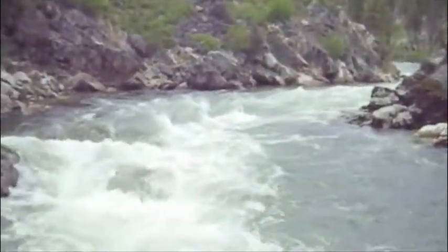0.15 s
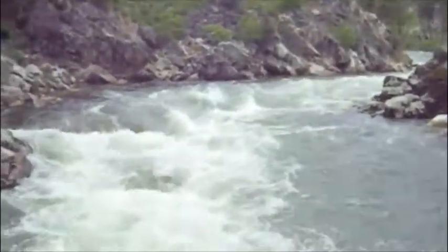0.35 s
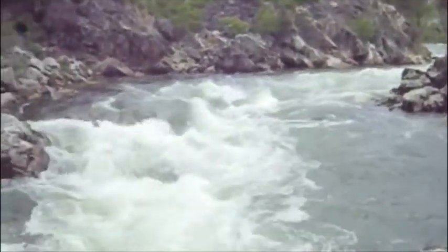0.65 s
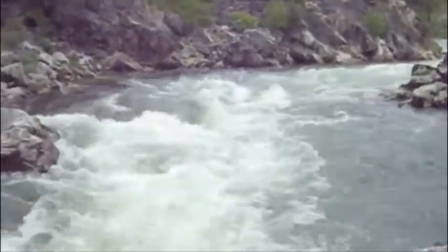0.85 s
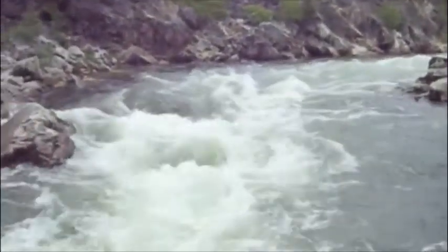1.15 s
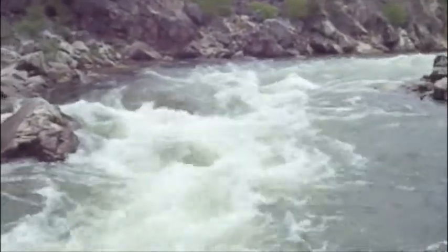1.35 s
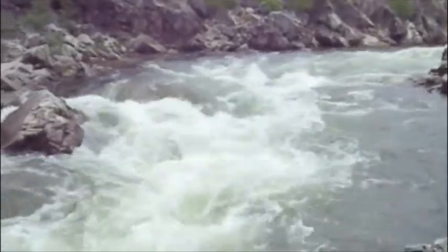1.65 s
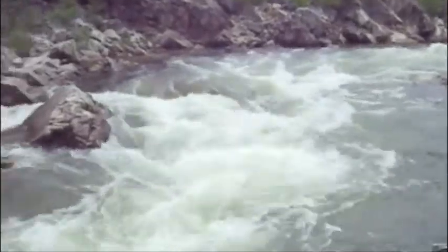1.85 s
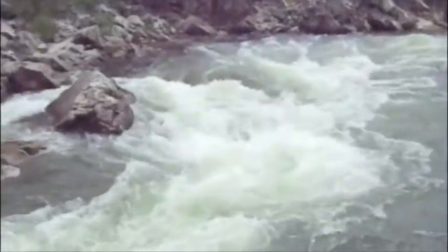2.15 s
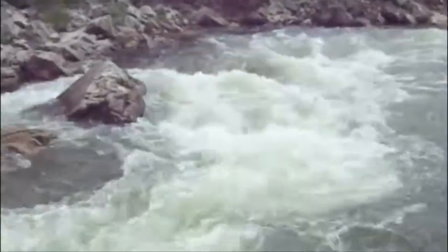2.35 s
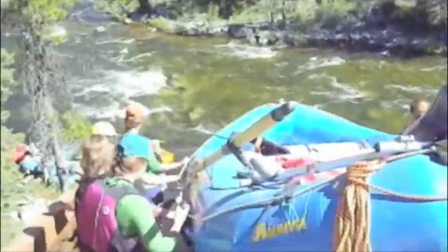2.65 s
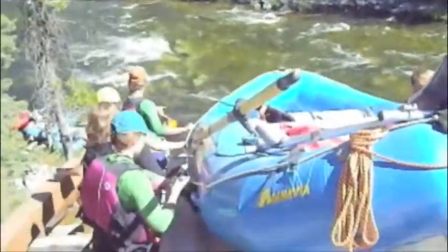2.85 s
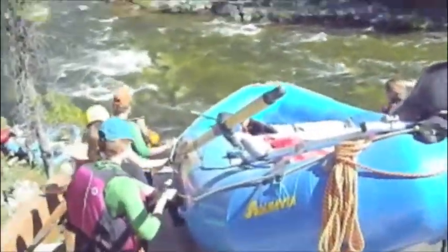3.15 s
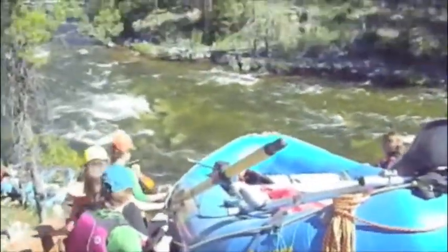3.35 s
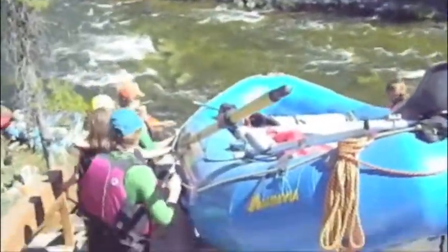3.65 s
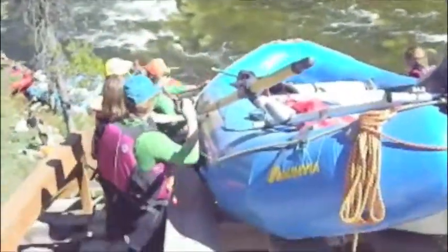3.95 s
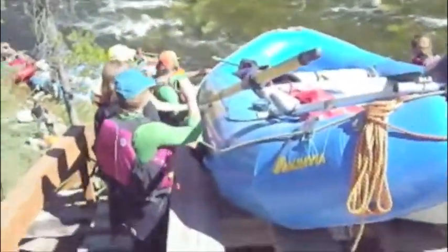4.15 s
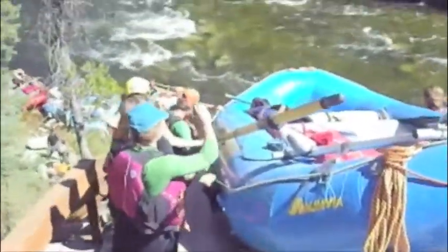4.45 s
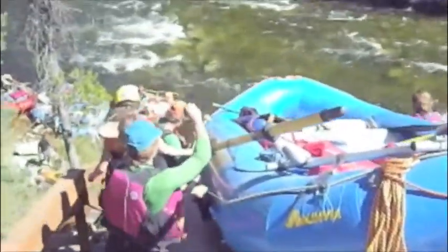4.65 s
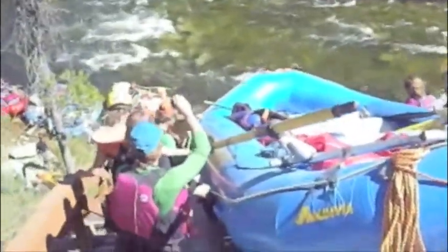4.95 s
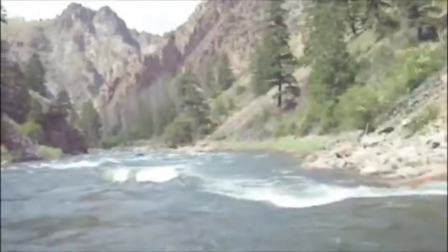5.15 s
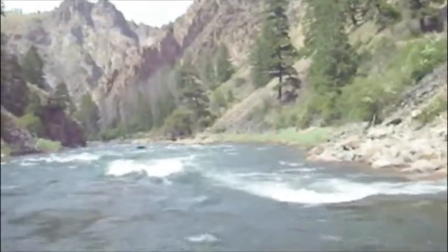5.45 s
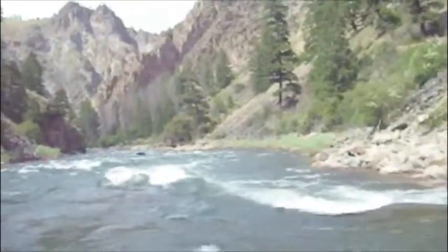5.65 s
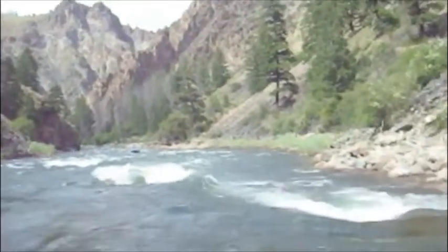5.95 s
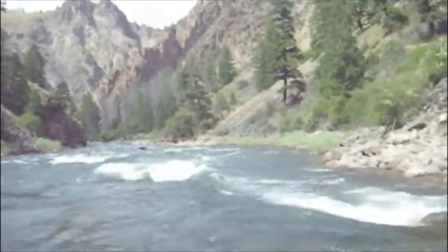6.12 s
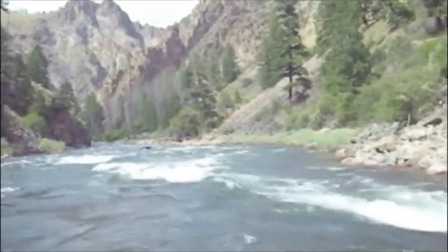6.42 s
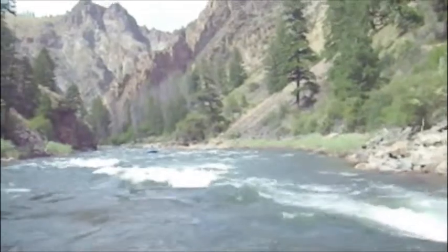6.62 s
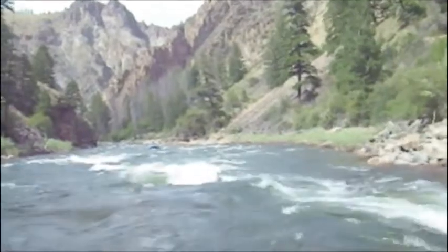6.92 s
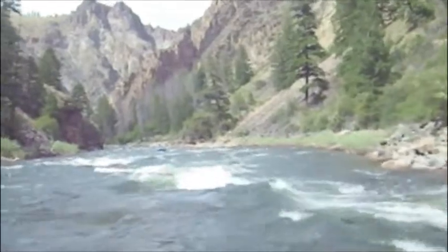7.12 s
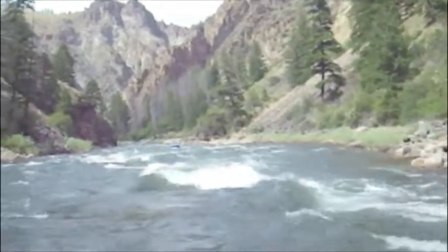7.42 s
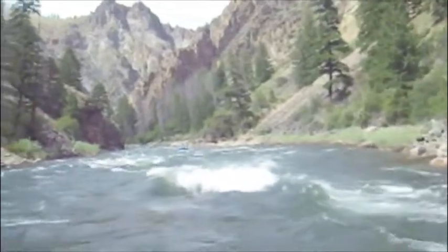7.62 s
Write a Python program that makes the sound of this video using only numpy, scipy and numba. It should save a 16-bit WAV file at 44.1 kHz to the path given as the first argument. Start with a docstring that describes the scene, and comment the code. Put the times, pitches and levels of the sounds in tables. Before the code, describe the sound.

A big river rapid roars close by, full of churning bubbles and hissing spray. It fades quickly to a much quieter shallow current beside a boat ramp, where wind brushes the microphone, raft gear knocks a few times and something squeaks faintly. Then the rush comes back louder as breaking waves draw nearer, with a few small splashes close by. One small mono microphone hears it all outdoors in a canyon.

```python
"""Three stretches of a canyon river, heard by one small mono microphone, each fading out before the next.
First a big rapid roars close by: clouds of ringing bubbles and bursting spray ride on churning water.
Then a shallow riffle runs past a boat ramp, where wind brushes the microphone, raft gear knocks and
something squeaks faintly. Last, a train of breaking waves draws nearer, with single splashes close by."""
import sys
import numpy as np
from scipy import signal
from scipy.fft import rfft, irfft, next_fast_len
from scipy.io import wavfile
from scipy.ndimage import uniform_filter1d, minimum_filter1d
from numba import njit

SR = 44100
rng = np.random.default_rng(int(sys.argv[2]) if len(sys.argv) > 2 else 0)


def materialize(psi):
    """Save the field psi as 16-bit PCM at rate SR to the path in sys.argv[1].

    A 1-D psi becomes a single channel; in a 2-D psi each row is a channel.
    """
    bounded = np.clip(np.atleast_2d(psi).T, -1, 1)
    quanta = np.round(bounded * 32767).astype(np.int16)
    wavfile.write(sys.argv[1], SR, quanta)


N = 343098
T = np.arange(N) / SR

# tone colour of the roar in each stretch: (frequency [Hz], relative level [dB])
RAPID_ROAR = [(10, -55), (25.0, -23.0), (62.6, -22.5), (184.0, -6.5), (447.0, -5.0), (614.0, 0.0),
              (950.0, -0.5), (1320.0, -4), (1620.0, -1.5), (2150.0, -6.0), (5300.0, -3.0), (6400.0, -7.5),
              (7650.0, -20.5), (10000, -58)]
RIFFLE_ROAR = [(30, -40), (130.0, -16.5), (328.0, -6.5), (424.0, -3.0), (819.0, 0.5), (995.0, -2.0),
               (1340.0, -4.0), (1750.0, -2.0), (2050.0, -7.5), (2300.0, -6.5), (3120.0, -10.0),
               (7000.0, -10.5), (7650.0, -15.5), (10000, -51)]
WAVES_ROAR = [(10, -50), (25.0, -21), (62.6, -25.5), (184.0, -7.5), (379.0, -5), (557.0, -0.5),
              (800.0, -2.5), (1600.0, -5.5), (2420.0, -7.5), (3100.0, -4), (3950.0, -10.0), (5100.0, -5.5),
              (6400.0, -13), (7650.0, -25.5), (10000, -57)]
# tone colour of the fine spray in each stretch: (frequency [Hz], relative level [dB])
RAPID_SPRAY = [(4760, -41), (8100, -0.5), (8630, 3), (11100, -0.5), (13400, -6.5), (14800, -25)]
RIFFLE_SPRAY = [(4760, -20), (8100, -6), (8410, 1), (9050, -7), (9890, 0), (11900, -11), (14800, -21)]
WAVES_SPRAY = [(4760, -28), (8100, -0.5), (8370, -2.5), (9890, -8.5), (11600, -7.5), (13600, -18),
               (14800, -28)]
# tone colour of the wind: (frequency [Hz], relative level [dB])
WIND_RUMBLE = [(8, -3), (22, 4), (45, -7), (90, -14.5), (200, -25), (900, -90)]
# gusts on the microphone: (peak time [s], level above the breeze [dB])
GUSTS = [(2.89, 4.5), (3.13, 4), (3.3, 4), (3.5, 5), (4.03, 6), (4.24, 4)]
# faint squeaks at the ramp: (time [s], length [s], start pitch [Hz], end pitch [Hz], peak level [dB])
SQUEAKS = [(3.03, 0.11, 1660, 1540, -31), (3.13, .07, 860, 880, -35), (3.249, 0.093, 1530, 1620, -31),
           (3.99, 0.103, 1410, 1510, -32), (4.0, .06, 1260, 1200, -30)]
# knocks of raft gear: (time [s], level [dB], lowest tone [Hz], time to fade by 60 dB [s])
KNOCKS = [(2.854, -9, 1760, 0.0089), (2.8555, -20, 790, 0.1), (2.878, -15, 1750, .01),
          (2.8786, -17.5, 850, 0.069), (3.145, -27, 860, .14), (4.2038, -13, 2620, 0.011),
          (4.372, -19, 860, 0.045), (4.4033, -17, 7200, .012), (4.404, -19, 9500, .022),
          (4.4133, -18, 9400, .022)]
# tones that struck gear rings with: (pitch [times the lowest tone], relative level [dB])
GEAR_TONES = [(1, 1.5), (1.2, -7), (1.55, -15), (2.5, -9)]
# close splashes, each trapping one bubble: (time [s], level [dB], pitch [Hz], ring length [cycles])
SPLASHES = [(5.17, -11, 3200, 14), (5.2384, -9, 11000, 16), (5.2384, -6, 2860, 29), (5.292, -17, 990, 22),
            (5.3028, -9.5, 3000, 32), (5.455, -13, 1440, 36), (7.116, -16, 4800, 16),
            (7.592, -14, 9000, 20)]
# moments when the water swells: (peak time [s], length [s], roar change [dB], spray change [dB])
SWELLS = [(0.1, 0.33, 1, 0.5), (0.325, .1, .8, 2), (1.76, 0.27, -0.3, 2.5), (2.197, .14, 1.5, 2.5),
          (2.907, 0.61, 3, 1.2)]
# sudden dips in the level, which then creeps back: (time [s], depth [dB])
DIPS = [(1.085, 1.5), (2.208, 4), (5.245, 3)]

RAMP_START_S, WAVES_START_S, FADE_S = 2.48, 5.047, 0.097
TOP_HZ = 14700  # the treble is cut off above this


def undb(db):
    """Turn decibels into a number to multiply a sound by."""
    return 10 ** (np.asarray(db) / 20)


def unit(x):
    """Scale a signal so that its average strength (rms) is 1."""
    return x / np.sqrt(np.mean(x ** 2))


def colour(x, points):
    """Give a sound the tone colour of a table, at strength 1."""
    size = next_fast_len(N)
    hz, db = np.transpose(points)
    bin_hz = np.maximum(np.arange(size // 2 + 1) * SR / size, 1)
    gain = undb(np.interp(np.log(bin_hz), np.log(hz), db))
    return unit(irfft(rfft(x, size) * gain, size)[:N])


def wander(rate):
    """A smooth random curve of strength 1 that heads for a new value `rate` times a second."""
    hold = int(SR / rate)
    steps = np.repeat(rng.standard_normal(N // hold + 1), hold)
    return unit(uniform_filter1d(uniform_filter1d(steps, hold), hold // 2)[:N])


def hump(peak_s, length_s):
    """A smooth rise from 0 to 1 and back."""
    return np.cos(np.pi * np.clip((T - peak_s) / length_s, -.5, .5)) ** 2


def fade(seconds_inside):
    """A straight fade from silence at the edge of a stretch."""
    return np.clip(seconds_inside / FADE_S, 0, 1)


def slap(decay_s, low_hz, high_hz, order=2):
    """The sound of a hit: a burst of noise between two frequencies that dies at once."""
    t = T[:SR // 10]
    decay = np.exp(-t / decay_s)
    band = signal.butter(order, [min(low_hz, SR / 4), min(high_hz, SR / 3)], "band", fs=SR, output="sos")
    burst = signal.sosfilt(band, rng.standard_normal(len(t)) * decay)
    return burst * np.linalg.norm(decay) / np.linalg.norm(burst)


def dull(x, edge_hz):
    """The small microphone hears little of a click's highest treble."""
    return signal.sosfilt(signal.butter(2, edge_hz, fs=SR, output="sos"), x)


def wind(breeze_db, flutter_db, gust_s):
    """Swirls of air buffet the microphone with a low flutter that grows in each gust."""
    gust_db = sum(db * hump(peak_s, gust_s) for peak_s, db in GUSTS)
    rumble = colour(rng.standard_normal(N), WIND_RUMBLE)
    return rumble * undb(breeze_db + gust_db + flutter_db * wander(rate=8))


def squeaks():
    """Thin sliding tones that swell and fade."""
    out = np.zeros(N)
    for start_s, length_s, from_hz, to_hz, db in SQUEAKS:
        first, n = int(start_s * SR), int(length_s * SR)
        phase = 2 * np.pi * np.cumsum(np.linspace(from_hz, to_hz, n)) / SR
        out[first:first + n] += undb(db) * np.hanning(n) * np.sin(phase)
    return out


def gear_knocks(crack_db, crack_s):
    """Struck gear gives a short crack and a few quickly dying tones; smaller parts crack higher."""
    out, t = np.zeros(N), T[:SR // 10]
    for start_s, db, hz, ring_s in KNOCKS:
        tones = sum(undb(tone_db) * np.sin(2 * np.pi * hz * ratio * t)
                    for ratio, tone_db in GEAR_TONES if hz * ratio < TOP_HZ)
        decay = np.exp(-np.log(1000) * t / ring_s)
        crack = undb(crack_db) * slap(crack_s, hz / 2, hz * 2, order=3)
        first = int(start_s * SR)
        out[first:first + len(t)] += undb(db) * (tones * decay + crack)
    return out


@njit
def ring_bubbles(start_s, hz, gain, cycles, glide):
    """Each bubble rings with a tone that dies away while its pitch rises by the fraction `glide`."""
    out = np.zeros(N)
    for k in range(len(start_s)):
        n = int(cycles[k] * SR / hz[k]) + 2
        angle = 2 * np.pi * hz[k] / SR
        # a point spiralling inwards traces the tone, fading by 50 dB in n samples
        step = np.exp(1j * angle - 5.8 / n)
        bend = np.exp(1j * angle * glide / n)
        point = gain[k] + 0j
        first = int(start_s[k] * SR)
        for i in range(first, min(first + n, N)):
            point *= step
            step *= bend
            out[i] += point.imag
    return out


def splashes(slap_db, slap_s, glide):
    """Water slaps the surface, then the trapped bubble rings."""
    start_s, db, hz, cycles = np.array(SPLASHES, float).T.copy()
    out = ring_bubbles(start_s, hz, undb(db), cycles, glide)
    for first, gain, pitch in zip((start_s * SR).astype(int), undb(db + slap_db), hz):
        burst = gain * slap(slap_s, pitch / 2, pitch * 2)
        out[first:first + len(burst)] += burst
    return out


def churn(flicker_db, flicker_rate, octaves=9):
    """Countless far bubbles blur into noise in which each octave flickers on its own."""
    size = next_fast_len(N)
    spectrum = rfft(rng.standard_normal(size))
    share_of_top = np.arange(1, len(spectrum) + 1) / len(spectrum)
    octave = np.clip(np.log2(share_of_top) + octaves, 0, octaves - 1).astype(int)
    bands = (irfft(spectrum * (octave == k), size)[:N] for k in range(octaves))
    return unit(sum(band * undb(flicker_db * wander(flicker_rate)) for band in bands))


def bubble_cloud(low_hz, high_hz, cycles, spread_db, glide, count):
    """Bubbles ring at random times, many quiet and a few loud, their power even from low to high."""
    when, pitch, chance, length = rng.random((count, 4)).T
    hz = low_hz + (high_hz - low_hz) * pitch ** 2
    extra_db = -spread_db * np.log(np.maximum(chance, 1 / 200))
    # high bubbles ring briefly and lie further apart in pitch, so each is made stronger
    gain = np.sqrt(hz * pitch) * undb(extra_db)
    return unit(ring_bubbles(when * N / SR, hz, gain, cycles * (.5 + length), glide))


def swelling():
    """How far the swells move the roar and the spray from their even flow, in dB."""
    return sum(np.outer([roar_db, spray_db], hump(peak_s, length_s))
               for peak_s, length_s, roar_db, spray_db in SWELLS)


def approach(near_s, roar_db_per_s, spray_db_per_s):
    """Roar and spray climb steadily to 0 dB as the waves come near, then stay there."""
    return np.outer([roar_db_per_s, spray_db_per_s], np.minimum(T - near_s, 0))


def dips(hold_s=0.064, recovery_db_per_s=11.5):
    """The level drops at once, stays down for a moment, then creeps back."""
    down_db = np.zeros(N)
    for start_s, depth_db in DIPS:
        recovered_db = recovery_db_per_s * np.maximum(T - start_s - hold_s, 0)
        down_db += (T >= start_s) * np.maximum(depth_db - recovered_db, 0)
    return undb(-down_db)


def whitewater(water, flow, roar_colour, spray_colour, gurgle_db, fizz_db,
               surge_db, surge_rate, roar_db, spray_db, hiss_share):
    """One stretch of river: bubbles and spray over the churn, all surging as crests collapse."""
    blur, gurgle, fizz = water
    roar_change_db, spray_change_db = flow
    foam = blur + undb(gurgle_db) * gurgle + undb(fizz_db) * fizz
    roar = colour(foam, roar_colour)
    hiss = signal.sosfilt(signal.butter(1, 2500, "high", fs=SR, output="sos"), roar)
    # the more spray there is, the brighter the roar
    extra_hiss = undb(hiss_share * (spray_change_db - roar_change_db)) - 1
    roar = (roar + hiss * extra_hiss) * undb(roar_db + roar_change_db)
    spray = colour(foam, spray_colour) * undb(spray_db + spray_change_db)
    return (roar + spray) * undb(surge_db * wander(surge_rate))


def scene():
    """The rapid, the boat ramp and the waves in turn, the same in both ears."""
    gurgle = bubble_cloud(low_hz=150.3, high_hz=2001, cycles=29.3, spread_db=1.54, glide=0.082, count=5000)
    fizz = bubble_cloud(low_hz=1650, high_hz=15600, cycles=6.3, spread_db=2.5, glide=.1, count=36000)
    water = churn(flicker_db=0.55, flicker_rate=14), gurgle, fizz
    rapid = whitewater(water, swelling(), RAPID_ROAR, RAPID_SPRAY, gurgle_db=-16, fizz_db=-6.5,
                       surge_db=0.5, surge_rate=20, roar_db=-12.0, spray_db=-32.4, hiss_share=0.31)
    riffle = whitewater(water, swelling(), RIFFLE_ROAR, RIFFLE_SPRAY, gurgle_db=-15.5, fizz_db=-6.5,
                        surge_db=0.2, surge_rate=22, roar_db=-25.5, spray_db=-46.0, hiss_share=0.68)
    nearing = approach(near_s=7.31, roar_db_per_s=0.75, spray_db_per_s=2)
    waves = whitewater(water, nearing, WAVES_ROAR, WAVES_SPRAY, gurgle_db=-15, fizz_db=-5,
                       surge_db=0.51, surge_rate=25, roar_db=-16.0, spray_db=-39.5, hiss_share=0.52)
    knocks = dull(gear_knocks(crack_db=1.5, crack_s=0.0012), edge_hz=6300)
    drops = dull(splashes(slap_db=0.5, slap_s=0.001, glide=.15), edge_hz=6000)
    ramp = riffle + wind(breeze_db=-44.0, flutter_db=1.5, gust_s=0.17) + squeaks() + knocks
    mono = rapid * dips() * fade(RAMP_START_S - T)
    mono += ramp * fade(T - RAMP_START_S) * fade(WAVES_START_S - T)
    mono += (waves * dips() + drops) * fade(T - WAVES_START_S)
    return np.tile(mono, (2, 1))


def record(dry):
    """The microphone misses a thin slice of treble; a limiter holds peaks down; the top is cut off."""
    notch_hz, peak_limit = 7870, .8
    notched = signal.lfilter(*signal.iirnotch(notch_hz, Q=22, fs=SR), dry)
    safe_gain = np.minimum(1, peak_limit / (np.abs(notched) + 1e-9))
    smooth_gain = uniform_filter1d(minimum_filter1d(safe_gain, size=89), size=89)  # over 2 ms
    treble_cut = signal.ellip(10, .2, 80, TOP_HZ, fs=SR, output="sos")
    return signal.sosfilt(treble_cut, notched * smooth_gain)


dry = scene()
out = record(dry)
materialize(out)
```